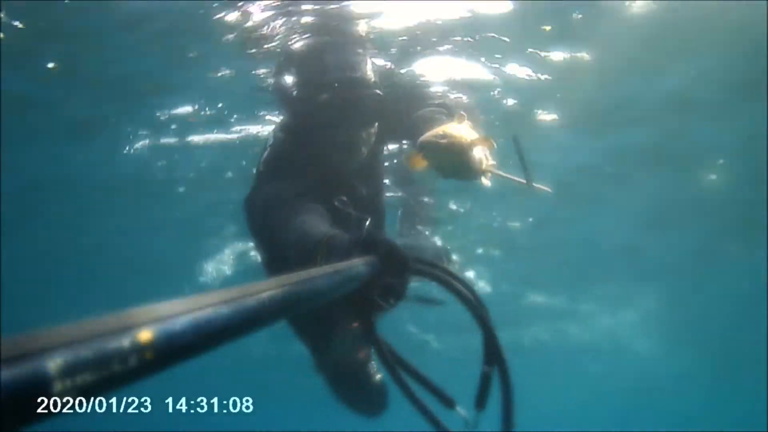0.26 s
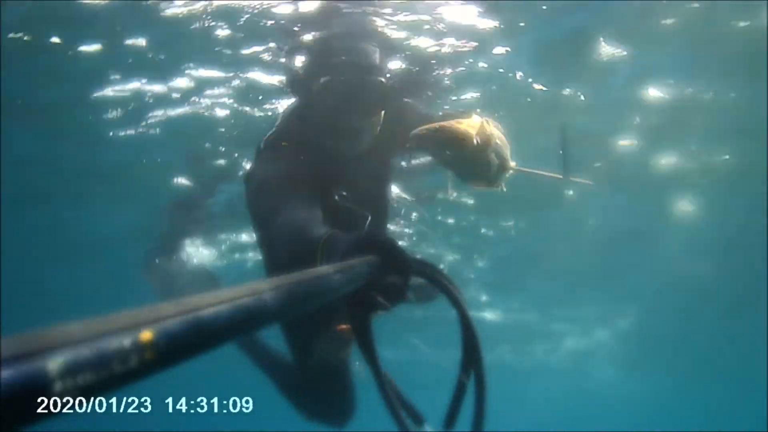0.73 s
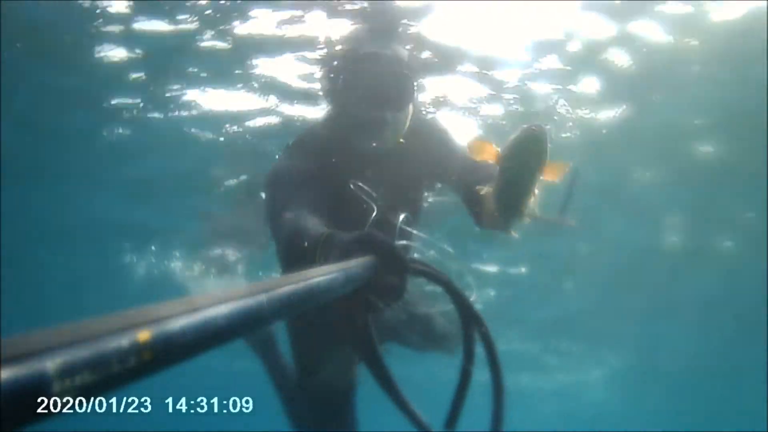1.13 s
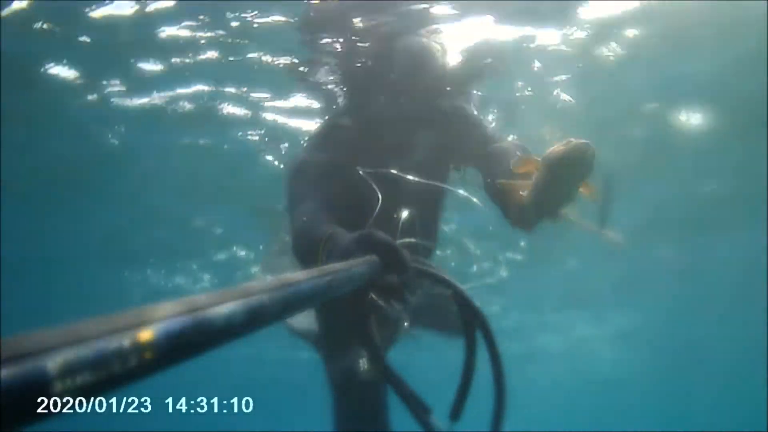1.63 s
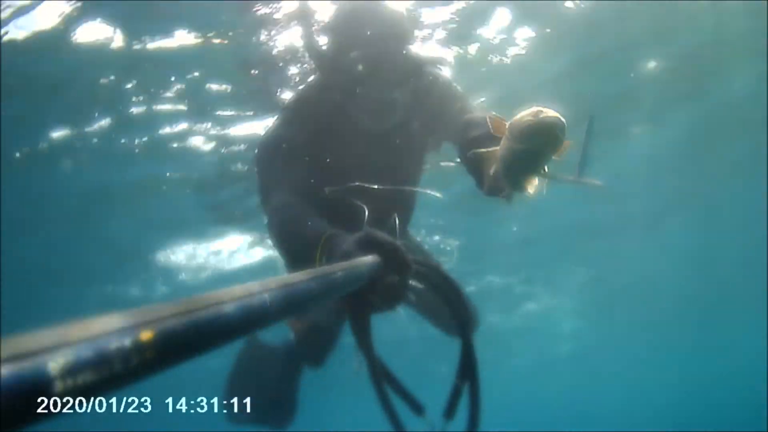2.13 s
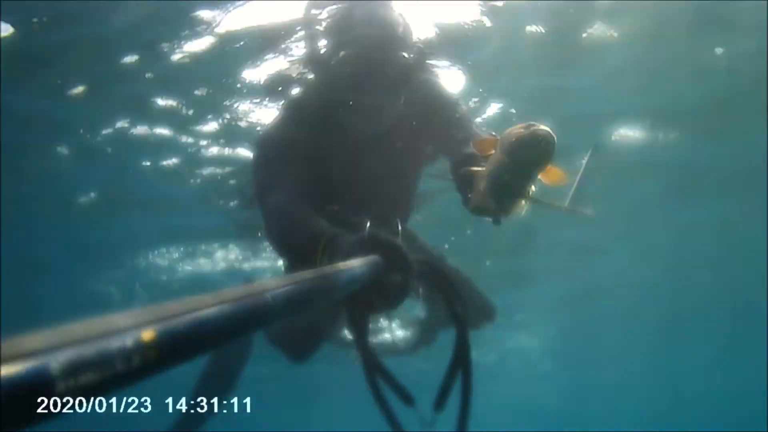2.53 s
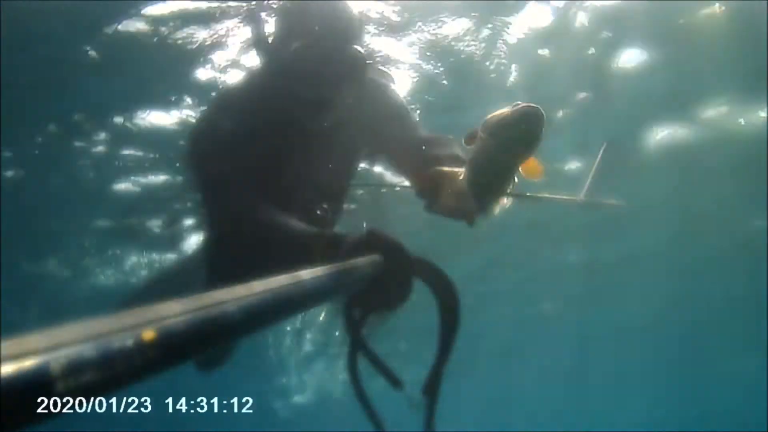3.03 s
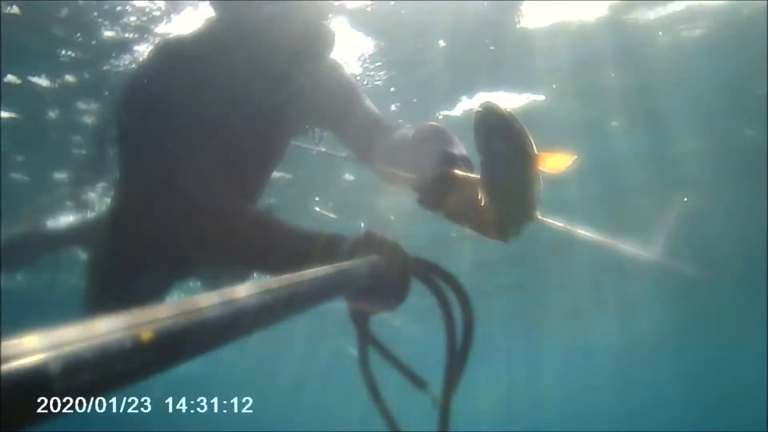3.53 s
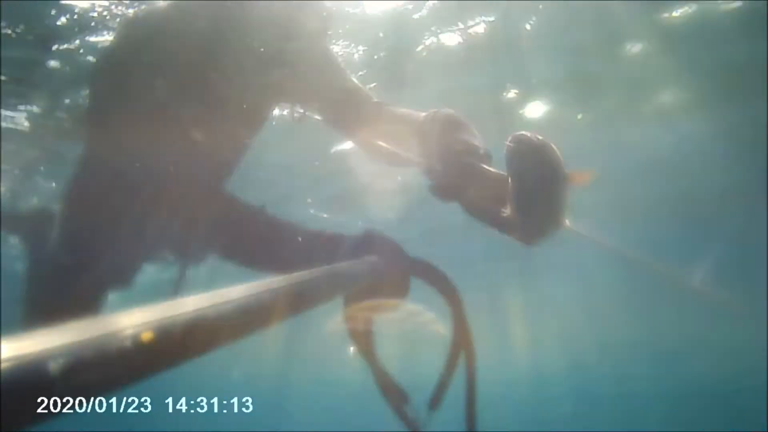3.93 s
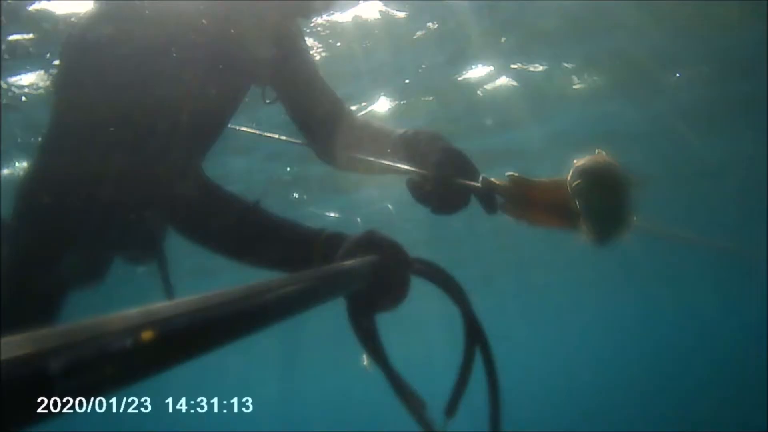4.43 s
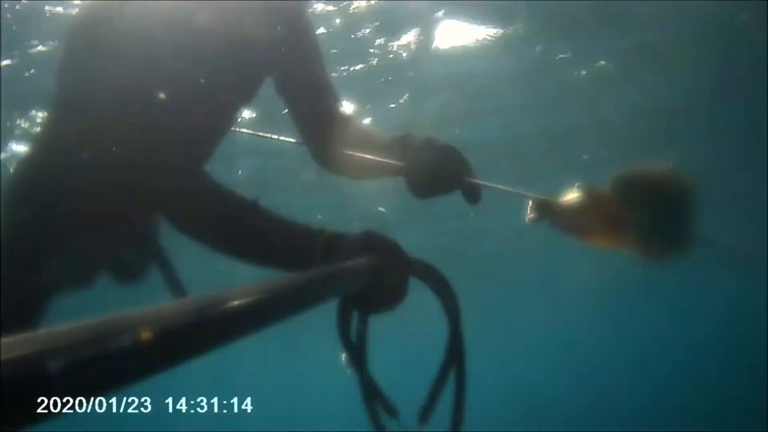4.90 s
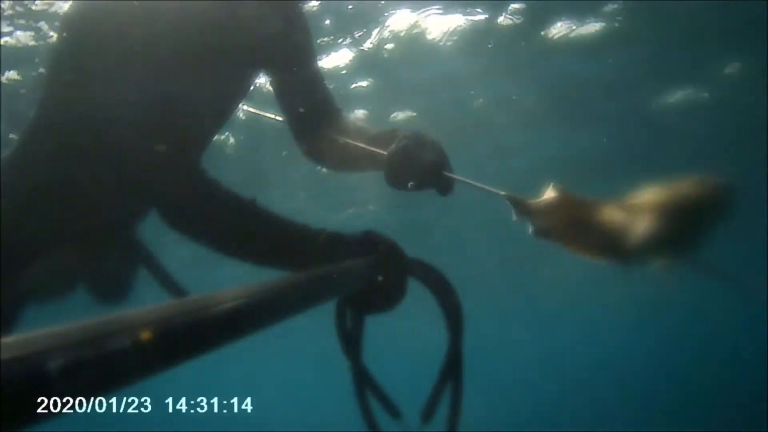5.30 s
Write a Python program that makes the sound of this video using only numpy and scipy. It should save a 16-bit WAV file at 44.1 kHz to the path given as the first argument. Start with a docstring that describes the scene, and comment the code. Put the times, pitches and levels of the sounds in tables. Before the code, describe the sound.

Snapping shrimp click and crackle underwater over a deep surging boom, soft bubbling and dull knocks on a speargun's camera mount.

```python
"""Underwater camera on a speargun

A camera in a waterproof housing rides on a speargun just under the sea surface, beside a diver.
Moving water sways the gun and drives a deep resonance; eddies and handling thump the mount.
Bubbles gurgle, water slaps the lid, and snapping shrimp click through the ringing housing walls."""
import sys
import numpy as np
from scipy import signal
from scipy.fft import rfft, irfft
from scipy.io import wavfile
from scipy.ndimage import uniform_filter1d

SR = 44100
rng = np.random.default_rng(int(sys.argv[2]) if len(sys.argv) > 2 else 0)


def wav_out(sig):
    """Save sig, one row per channel (or a flat mono array), as 16-bit PCM at SR to the path in sys.argv[1]."""
    wavfile.write(sys.argv[1], SR, np.round(np.clip(np.atleast_2d(sig).T, -1, 1) * 32767).astype(np.int16))


N = 245195
TIME = np.arange(N) / SR

# Sound transmission through the housing walls: frequency_hz, gain_db
WALL_TRANSMISSION = [(260, -22), (450, -13), (587, 3), (790, -15.5), (943, -18), (1080, -15.5),
                     (1230, -22.5), (1490, -13.5), (1860, -11.5), (2100, -13), (2360, -22.5), (2780, -20),
                     (3220, -10.5), (4210, -21), (4950, -28.5), (6280, -19), (6860, -28), (7390, -22.5),
                     (8070, -34), (9090, -23), (10400, -29.5), (14000, -25), (15500, -34)]


def boom():
    """Forced vibration: surges of water drive the lowest resonance, over a slow sway of pressure."""
    # Surges against the gun: start_s, length_s, level_db, pitch_hz
    surges = [(0.0, 0.31, -24, 45.45), (.51, 0.13, -17.5, 43.24), (0.708, 0.34, -25.5, 41.02),
              (0.921, 0.14, -22.5, 44.44), (1.031, 0.095, -18.5, 45.37), (1.247, 0.078, -19, 47.2),
              (1.364, .1, -23.5, 44.83), (1.698, 0.072, -22.5, 46.4), (1.996, 0.27, -23.5, 46.1),
              (2.386, 0.066, -26.5, 46.75), (2.495, 0.063, -19.5, 46.22), (2.643, 0.12, -22, 45.96),
              (2.997, 0.06, -32, 42.3), (3.2, 0.12, -31, 42.58), (3.604, 0.073, -26, 42.58),
              (3.701, 0.087, -18.5, 43.6), (3.936, 0.13, -30, 48.23), (4.21, 0.02, -40, 48.3),
              (4.364, 0.021, -48, 44.43), (4.5, 0.067, -28, 45.82), (4.766, 0.15, -19, 42.72),
              (4.986, 0.2, -23.5, 41.23), (5.407, 0.08, -20.5, 47.6)]
    # Strength of the slow pressure swings: time_s, level_db
    sway_levels = [(0.0, -25), (0.04, -22.5), (1.79, -27), (1.84, -17), (2.32, -24.5), (4.69, -25.5),
                   (4.74, -35.5), (5.22, -17), (5.33, -32.5), (5.56, -25.5)]
    idle_db, sag_db_per_s = -35.5, 12
    power = undb(idle_db) ** 2
    for start, length, db, _ in surges:
        sag_db = sag_db_per_s * np.maximum(TIME - start, 0)
        surge = undb(db - sag_db) * gust(start, length, attack_s=0.019, release_s=0.053)
        power = power + surge ** 2
    pitch = curve([(start + length / 2, hz) for start, length, _, hz in surges])
    turbulence = unit(band(rng.standard_normal(N), 24.9, 58.4, order=4))
    resonance = (tone(pitch + walk(26.81)) + undb(-4) * turbulence) * np.sqrt(power)
    sway = tone(11 + 2.343 * walk(28)) * undb(curve(sway_levels) + 0.95 * walk(40))
    return band(resonance + undb(1) * sway, 1.7, 61.5, order=6)


def mount():
    """Modal response: eddies and knocks excite the mount, and each knock sheds a wake of more eddies."""
    # Modes of gun and mount: pitch_hz, width_hz, gain_db
    modes = [(93, 30, -3.5), (129.6, 15.7, 1.5), (157.3, 7.4, 5.5), (171.3, 4.3, 1), (218.4, 9.3, -0.5),
             (260.5, 23, -4.5)]
    # Eddies in the flow along the housing: time_s, level_db
    flow = [(0, -49), (.3, -56.5), (.65, -47), (.82, -49.5), (1.15, -43), (1.42, -53), (1.84, -51.5),
            (2.14, -43), (2.4, -44.5), (2.68, -49), (2.9, -64), (3.15, -48.5), (3.45, -53), (3.8, -47),
            (4.22, -58.5), (4.55, -48), (4.94, -37.5), (5.07, -55), (5.56, -47.5)]
    # Knocks on the mount: start_s, level_db, pitch_hz, t60_s
    thumps = [(0.091, -39.5, 137, 0.16), (0.434, -44, 245, .04), (0.511, -35, 112, 0.028),
              (0.862, -36, 140, 0.0057), (0.959, -32, 118, 0.075), (1.015, -40, 250, .1),
              (1.042, -38, 151, 0.038), (1.209, -23.5, 130, 0.032), (1.24, -38, 218, .08),
              (1.29, -35.5, 153, 0.043), (1.451, -41, 147, .05), (1.476, -33.5, 170, 0.12),
              (1.689, -30, 146.6, 0.03), (1.911, -38, 138.5, 0.042), (1.954, -32, 146, 0.082),
              (2.018, -37, 145.8, 0.036), (2.05, -25, 202, 0.046), (2.118, -36, 159, 0.05),
              (2.171, -39, 149.9, 0.066), (2.278, -32, 141.6, 0.064), (2.345, -39, 140, 0.033),
              (2.45, -32.5, 124, 0.11), (2.715, -38, 132, 0.089), (2.963, -43, 139, 0.064),
              (3.189, -41.5, 144.6, 0.059), (3.534, -33.5, 142, 0.035), (3.596, -31.5, 155.6, 0.13),
              (3.68, -31, 149.2, 0.14), (3.83, -42.5, 156.3, 0.16), (4.03, -39, 142.1, 0.027),
              (4.373, -38, 153, 0.034), (4.496, -37, 171.4, 0.15), (4.526, -36, 210, 0.11),
              (4.645, -28, 120.7, 0.096), (4.769, -28, 136, 0.037), (4.85, -36, 250, .07),
              (4.88, -30.5, 149, 0.05), (4.89, -35, 213, .12), (4.915, -31.5, 157.2, 0.1),
              (5.116, -22, 151.8, 0.049), (5.162, -31.5, 135, 0.051), (5.376, -20, 129.3, 0.048)]
    usual_knock_db, hardening_db_per_db = -34.5, 0.5
    passband_hz = (62.5, 299)
    eddies = ring(impulses(rate_per_s=300, spread_db=1), modes)
    patter = steady(band(eddies, 84, 216, order=3), span_s=0.031)
    knocks, eddy_power = np.zeros(N), undb(curve(flow)) ** 2
    for start, db, hz, t60 in thumps:
        overtone_db = db - 14 + hardening_db_per_db * (db - usual_knock_db)  # harder is brighter
        add(knocks, start, undb(db) * pulse(hz, rise_s=0.0044, t60_s=t60, glide=0.0094))
        add(knocks, start, undb(overtone_db) * pulse(hz * 1.626, rise_s=0.0055, t60_s=0.063, glide=0.016))
        wake = undb(db - 6) * gust(start, length_s=0.018, attack_s=0.018, release_s=0.032)
        eddy_power = eddy_power + wake ** 2
    buffeting = patter * np.sqrt(eddy_power) * undb(2 * walk(24))
    shaking = buffeting + undb(-0.5) * knocks + undb(1) * ring(knocks, modes)
    # filtered forwards and backwards: steep edges and no delay
    forwards = band(shaking, *passband_hz, order=4)
    return band(forwards[::-1], *passband_hz, order=4)[::-1]


def bubbles(count=1800):
    """Bubble resonance: large bubbles ring with rising pitch; a froth gurgles through the lid's modes."""
    # Single large bubbles: start_s, level_db, pitch_hz, t60_s
    large_bubbles = [(0.097, -33, 569, 0.084), (.215, -47.5, 580, 0.15), (0.254, -41, 374, 0.17),
                     (.52, -47.5, 573, 0.11), (0.703, -44, 590, 0.041), (.94, -47, 600, 0.03),
                     (1.082, -35, 584, 0.061), (1.113, -42.5, 570, 0.24), (1.158, -39.5, 577, 0.1),
                     (1.43, -43, 583, 0.17), (1.575, -44, 526, 0.18), (1.61, -42.5, 613, 0.1),
                     (2.18, -55, 707, 0.19), (2.82, -47, 610, 0.078), (2.883, -45.5, 520, 0.035),
                     (3.167, -39, 480, 0.098), (3.35, -47, 458.5, 0.051), (3.425, -48.5, 612, 0.13),
                     (3.76, -46, 590, 0.046), (5.095, -44, 595, 0.13), (5.381, -43, 400, .05),
                     (5.47, -50, 417, 0.3), (5.53, -46, 470, .1)]
    # Modes of the air and lid of the housing: pitch_hz, width_hz, gain_db
    lid_modes = [(308, 52, -8), (374, 12, -13), (411, 16, -17), (543, 110, -17), (579.7, 44, 13.5),
                 (550, 22, -20.5), (740, 47, -24.5)]
    # Froth at the surface: time_s, fine_db, coarse_db
    froth_levels = [(0, -55.5, -51), (.15, -49.5, -54), (.63, -64, -67), (.9, -53.5, -54.5),
                    (1.1, -48.5, -51), (1.83, -59, -65.5), (2.1, -52.5, -67.5), (2.48, -67, -69),
                    (2.78, -52.5, -59.5), (3.0, -59.5, -67.5), (3.15, -52, -53), (3.4, -54, -55.5),
                    (3.62, -63, -63), (4.3, -64, -68), (4.55, -58.5, -63), (4.98, -75, -73),
                    (5.1, -52, -63.5), (5.56, -55.5, -56)]
    large, small = np.zeros((2, N))
    for start, db, hz, t60 in large_bubbles:
        add(large, start, undb(db) * pulse(hz, rise_s=0.0065, t60_s=t60, glide=0.043))
    for when, smallness, strength in rng.random((count, 3)):
        bubble = pulse(285 * 2.906 ** smallness, rise_s=0.0027, t60_s=0.062, glide=0.056)
        add(small, when * TIME[-1], undb(6.8 * strength) * bubble)
    froth = ring(small, lid_modes)
    fine = steady(band(froth, 462, 748, order=3), span_s=0.17) * undb(curve(froth_levels))
    coarse = steady(band(froth, 264, 486, order=3), span_s=0.27) * undb(curve(froth_levels, column=2))
    return undb(5) * large + undb(4) * (fine + coarse)


def slaps():
    """Transient excitation: a brief rough push of water rings the lid with a hollow gulp."""
    # Water striking the lid: start_s, level_db
    strikes = [(.383, -43.5), (.435, -51), (.7, -52), (.85, -39), (.94, -44.5), (1.075, -43), (1.42, -45),
               (2.02, -50), (2.335, -50), (2.601, -44), (2.714, -43), (3.105, -36.5), (4.494, -37.5),
               (4.587, -42), (4.627, -37.5), (4.748, -43.5), (4.845, -48), (5.272, -34.5), (5.376, -46)]
    # Lid modes that a slap excites: pitch_hz, width_hz, gain_db
    modes = [(414, 39, -4), (511, 57, -7.5), (601, 24, 6), (1077, 61, -21)]
    push_s = 0.0058
    out, t = np.zeros(N), TIME[:SR // 6]
    for start, db in strikes:
        push = rng.standard_normal(len(t)) * t / push_s * np.exp(-t / push_s)
        gulp = band(ring(push, modes), 343, 1150, order=3)
        add(out, start, undb(db) * gulp / np.abs(gulp).max())
    return undb(3) * out


def near_shrimp():
    """Impulse response: each snap rings the housing walls; its direction picks the modes that ping."""
    # Near snaps: start_s, level_db, presence_db, treble_db, tail_db, then per mode pitch_hz, level_db
    snaps = [(.052, -44, -5, 0.5, 4), (0.156, -45.5, 4, 19, -6), (.194, -46, 7, 15, -19),
             (0.276, -48.5, 2, 2, -1, 2340, -3), (0.3221, -38.5, -7, -2, -2, 3070, -1),
             (.383, -37, -1, 3, -4, 3100, 2, 2040, 2, 5750, -6), (.499, -45, -2, -14, -3, 1960, 3),
             (.5473, -44, -5, -23, -4, 3250, 1), (.5977, -50.5, 3, 6, 2, 3400, 0),
             (.847, -39, -8, -7, 7, 1976, -4, 5950, -14), (.8576, -39.5, -5, -3, 5, 1930, -7.5),
             (.959, -43.5, -1, -17, -4, 3230, -2), (1.131, -47, 2, 9, -2, 3300, -7),
             (1.162, -38.5, -17, -7, -4, 1840, -7), (1.215, -49.5, 1, 16.5, -2),
             (1.3134, -37.5, 2, -12, 0, 3350, -2, 1110, -8), (1.541, -45.5, 7, 6, 1, 1855, -3),
             (1.72, -48.5, -3, -16, -9, 1570, -4), (1.749, -47, 0, -4, -3, 1900, -4),
             (1.9099, -33, -4.5, -8, -10, 3100, 5, 1600, 1), (1.981, -49.5, 0, 7, 2, 1450, -8),
             (2.0206, -41, 10, 9, -4, 3300, -5), (2.1122, -53, 0, 7, 0, 3123, 0), (2.2424, -51, -2, -1, 3),
             (2.3321, -45, 2.5, 7, 3, 3222, -10), (2.5351, -42.5, 0, 1, -8, 2192, -1),
             (2.602, -42, 7, 9, -3, 3420, -5), (2.6155, -46, 8, 15, -5, 6300, -8),
             (2.6998, -37.5, -8, -4, -3, 2680, -1.5, 1500, -4), (2.728, -45, 0, -2, -6, 3200, -4),
             (2.772, -42, 5.5, 3, 7, 1810, -9), (2.8221, -51, 15, 8, -2),
             (2.835, -37.5, 2, -1, 1, 1800, -2, 3850, -9), (2.874, -47, -2, -4, -2),
             (2.9655, -45.5, 5, 0, 1), (3.1082, -33.5, -2, -4, -6, 2080, -4, 3200, -5, 900, -11),
             (3.595, -48.5, 4, 7, -19, 3480, -2), (3.6366, -49, 9, 10, -11, 2070, -7),
             (3.682, -49.5, 5, 7, 4, 1750, -2), (3.762, -44, -0.5, 0, 5),
             (3.8889, -48.5, -2, -1.5, -12, 1990, -4), (3.9601, -54, 4, 12, 3, 3563, 6),
             (4.02, -46, -1.5, -6, 5, 1050, -8), (4.0915, -48, -15, -11, 3, 1809, -4),
             (4.113, -48, 0, -2, 7), (4.1815, -34.5, -0.5, 2.5, -0.5, 1560, -9),
             (4.2481, -34.5, -15, -4, -1, 1845, 3), (4.2618, -49.5, 1, 10, 2),
             (4.3219, -45.5, 0, -6, 0, 3250, 4), (4.5049, -30.5, 6, -7, -8, 3200, -2, 1950, -5, 4150, -7),
             (4.6088, -44, 0, 1, 6, 2022, -5), (4.632, -46, -12, -8, 0, 1050, -4),
             (4.6573, -49.5, 11, 19, -2), (4.7188, -48.5, 14, 21, 0, 3420, -3),
             (4.792, -37.5, 1, 0, -5, 3250, 1, 5750, -6), (4.8966, -53, 3, -4, 4, 3120, -8),
             (4.9471, -48.5, 10, 9, -3, 3364, -10), (4.992, -47.5, 12, 16, 10.5, 2980, -7),
             (5.013, -44.5, -1, -15, 1), (5.0713, -39.5, -7, -31, -2, 1791, 1),
             (5.1252, -50, 7, 8, -11, 3730, -2, 6000, -3), (5.1668, -52, -10, 0, -3, 1510, 15),
             (5.2685, -44.5, 9, 4, -6), (5.2849, -35, -9, 1, -9.5, 1780, -4, 4480, -11, 6400, -11),
             (5.366, -48, -2, -3, -3), (5.4287, -46.5, 2, 6, 4, 3270, 7)]
    # Woody knock of the housing under a snap: pitch_hz, width_hz, gain_db
    knock_modes = [(1080, 47, -21), (1860, 170, -10), (3200, 140, -3.5)]
    mode_width_hz, drive_s = 330, 0.012  # water damps the walls, so a ping is short
    body = [(400, -15), (650, -6.5), (900, -1), (1300, 3), (2200, 2.5)]  # frequency_hz, gain_db
    out = np.zeros(N)
    for start, db, presence_db, treble_db, tail_db, *pings in snaps:
        top = [(3000, presence_db + 1), (4400, presence_db + 0.3), (5800, treble_db - 5.5),
               (8000, treble_db - 8), (10500, treble_db - 19), (14000, treble_db - 27)]
        arrival = sea_path(echo_db=3, tail_db=tail_db + 1)
        crack = colour(colour(arrival, WALL_TRANSMISSION), body + top)
        snap = unit(crack + ring(crack, knock_modes))
        # only the first arrivals are strong enough to make a mode ping
        blow = arrival * np.exp(-TIME[:len(arrival)] / drive_s)
        for mode_hz, mode_db in zip(pings[::2], pings[1::2]):
            ping = ring(blow, [(mode_hz, mode_width_hz, 0)])
            ping = ring(ping, [(mode_hz, 900, 0)])  # steepens the skirts of the resonance
            snap = snap + undb(mode_db) * unit(ping)
        add(out, start, snap * undb(db) / np.std(snap[:SR // 100]))  # level set by the first 10 ms
    return out


def far_shrimp(directions=8):
    """Superposition: faint snaps from several directions crackle, and the farthest merge with hiss."""
    # Spectrum of far crackle merged with hiss: frequency_hz, density_db
    hiss_spectrum = [(470, -36.5), (800, -31.5), (928, -7.5), (1060, -2), (1230, -8.5), (1510, -9),
                     (1810, 0.5), (2100, -6), (2350, -9), (2830, -10.5), (3090, 1.5), (3290, 2.5),
                     (4890, -10.5), (6340, -7), (8130, -18), (8750, -6.5), (9600, -10), (10400, -21.5),
                     (14000, -21.5), (15500, -31)]
    crackle = 0
    for _ in range(directions):
        snaps = impulses(rate_per_s=12, spread_db=4.2)
        arrivals = signal.oaconvolve(snaps, sea_path(echo_db=3, tail_db=0))[:N]
        crackle = crackle + through_walls(arrivals)
    crackle = steady(band(crackle, 930, 10500), span_s=0.12) * undb(0.8 * walk(14))
    hiss = unit(colour(rng.standard_normal(N), hiss_spectrum))
    swell = undb(1.5 * walk(22))
    return (undb(-58) * crackle + undb(-64.2) * hiss) * swell


def whine():
    """Frequency modulation: thin tones from the camera's electronics waver at random."""
    # Electrical tones: pitch_hz, level_db
    tones = [(8707, -87), (8900, -87), (9375, -84), (9850, -90)]
    return sum(undb(db) * tone(hz + 4 * walk(30)) for hz, db in tones)


def sea_path(echo_db, tail_db):
    """Multipath propagation: a snap arrives directly, then off surface and gun, then off the rocks."""
    t = TIME[:SR // 10]
    echoes, scatter = rng.standard_normal((2, len(t)))
    early = undb(echo_db) * unit(echoes * np.exp(-t / 0.0027))
    tail = undb(tail_db) * unit(scatter * np.exp(-t / 0.019))
    direct = t == 0
    return direct + (early + tail) / np.sqrt(len(t))


def through_walls(x, count=4):
    """Resonant transmission: each direction of arrival favours its own random set of wall modes."""
    modes = [(1400 * 5.4 ** place, 260, 2) for place in rng.random(count)]
    return colour(x + ring(x, modes), WALL_TRANSMISSION)


def pulse(hz, rise_s, t60_s, glide):
    """Damped oscillation that builds up while its pitch glides; the envelope peaks at 1."""
    t = TIME[:int((t60_s + 2 * rise_s) * SR)]
    onset = 1 - np.exp(-(t / rise_s) ** 2)
    envelope = onset * np.exp(-np.log(1000) * t / t60_s) * (1 - t / t[-1])
    pitch = hz * (1 + glide * np.tanh(t / t60_s))
    return envelope / envelope.max() * np.sin(2 * np.pi * np.cumsum(pitch) / SR)


def tone(hz):
    """Sinusoid of rms 1 whose phase integrates a moving pitch."""
    return np.sqrt(2) * np.sin(2 * np.pi * np.cumsum(hz) / SR)


def impulses(rate_per_s, spread_db):
    """Poisson process: random impulses of either sign, mostly small, a few large."""
    chance, strength, side = rng.random((3, N))
    exponential = -np.log(np.maximum(strength, 0.03))
    return (chance < rate_per_s / SR) * undb(spread_db * exponential) * np.sign(side - 0.5)


def gust(start_s, length_s, attack_s, release_s):
    """Envelope that rises smoothly, holds to the end of its length and decays exponentially."""
    rise = np.sin(np.pi / 2 * np.clip((TIME - start_s) / attack_s, 0, 1)) ** 2
    return rise * np.exp(-np.clip((TIME - start_s - length_s) / release_s, 0, 20))


def walk(rate_hz):
    """Slow fluctuation: random held steps, smoothed twice; spread near 1."""
    hold = int(SR / rate_hz)
    steps = rng.standard_normal(N)[np.arange(N) // hold]
    return 1.458 * uniform_filter1d(uniform_filter1d(steps, hold), hold)


def curve(rows, column=1):
    """Linear interpolation of one column of rows that begin with time_s."""
    columns = np.transpose(rows)
    return np.interp(TIME, columns[0], columns[column])


def ring(x, modes):
    """Parallel resonators, one per row of pitch_hz, width_hz, gain_db."""
    return sum(undb(db) * signal.lfilter(*signal.iirpeak(hz, hz / width, SR), x)
               for hz, width, db in modes)


def band(x, lo_hz, hi_hz, order=2):
    """Maximally flat band-pass filter."""
    return signal.sosfilt(signal.butter(order, [lo_hz, hi_hz], "band", fs=SR, output="sos"), x)


def colour(x, points, size=2048):
    """Minimum-phase filter through points of frequency_hz, gain_db."""
    hz, db = np.transpose(points)
    bin_hz = np.arange(size // 2 + 1) * SR / size
    gain = undb(np.interp(np.log(bin_hz + 1), np.log(hz), db))
    cepstrum = irfft(np.log(gain))
    cepstrum[1:size // 2] *= 2
    cepstrum[size // 2 + 1:] = 0
    return signal.fftconvolve(x, irfft(np.exp(rfft(cepstrum))))[:len(x)]


def steady(x, span_s):
    """Division by the running rms evens out a random process."""
    span = int(span_s * SR)
    power = uniform_filter1d(uniform_filter1d(x ** 2, span), span)
    return x / np.sqrt(np.abs(power) + np.mean(x ** 2) / 100)


def undb(db):
    """Decibels to amplitude ratio."""
    return 10 ** (np.asarray(db) / 20)


def unit(x):
    """Normalisation to rms 1."""
    return x / np.sqrt(np.mean(x ** 2))


def add(track, start_s, sound):
    """Superpose a sound on the track."""
    i = int(np.clip(start_s * SR, 0, N - 1))
    track[i:i + len(sound)] += sound[:N - i]


def scene():
    """Superposition at one microphone inside the housing; boom and mount ease in and out."""
    from_edge_s = np.minimum(TIME, TIME[-1] - TIME)
    ease = np.sin(np.pi / 2 * np.clip(from_edge_s / 0.025, 0, 1)) ** 2
    return (ease * (boom() + mount()) + bubbles() + slaps() + near_shrimp() + far_shrimp() + whine())[None]


def record(dry):
    """Band limiting: the camera cuts the top treble with a steep low-pass."""
    cutoff_hz = 15600
    return signal.sosfilt(signal.ellip(8, 0.2, 70, cutoff_hz, fs=SR, output="sos"), dry)


dry = scene()
out = record(dry)
wav_out(out)
```